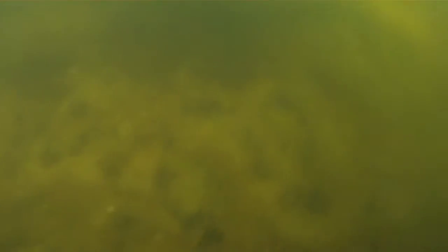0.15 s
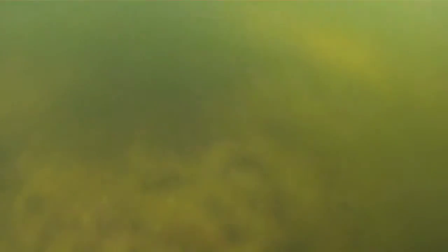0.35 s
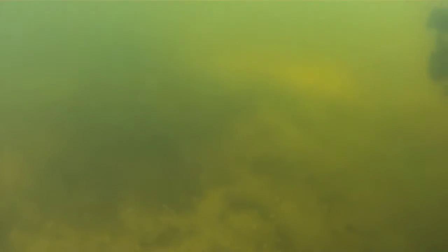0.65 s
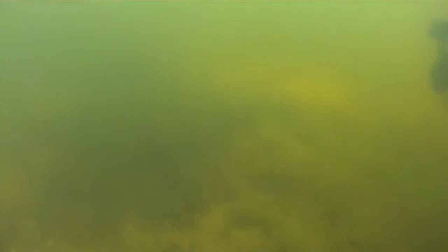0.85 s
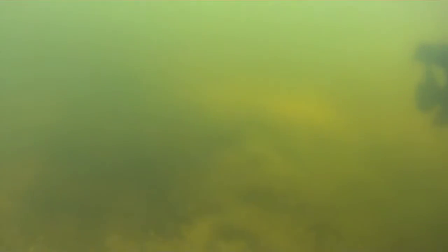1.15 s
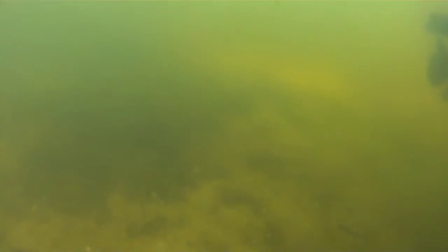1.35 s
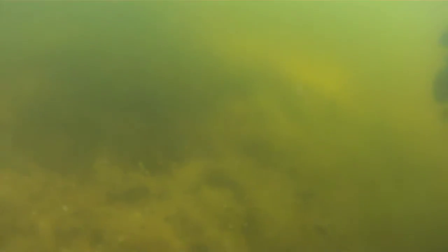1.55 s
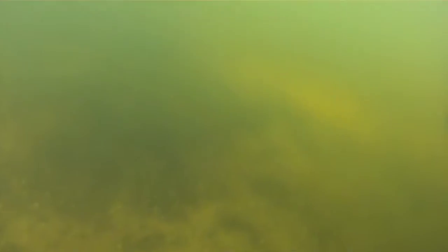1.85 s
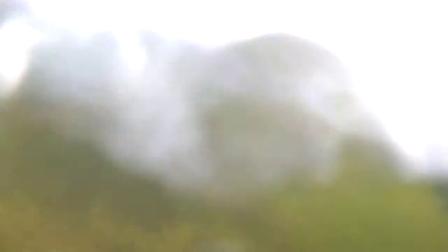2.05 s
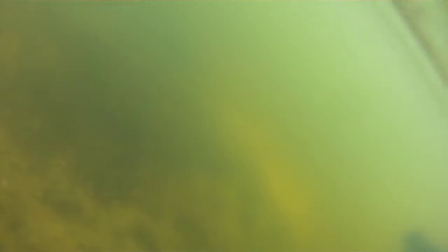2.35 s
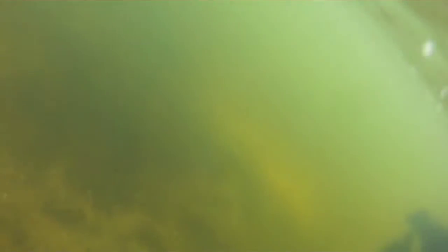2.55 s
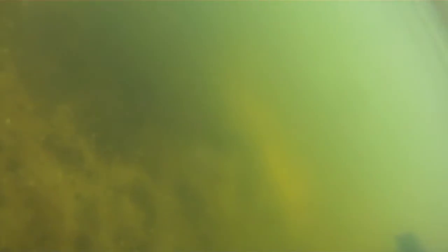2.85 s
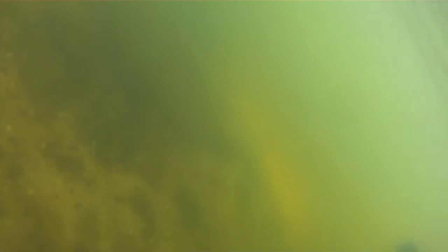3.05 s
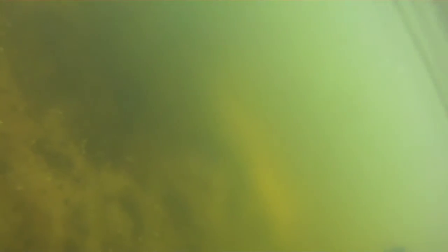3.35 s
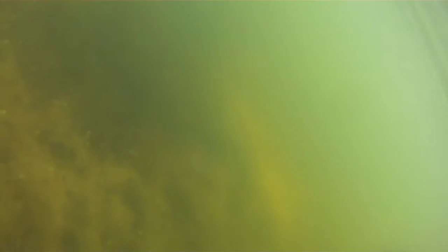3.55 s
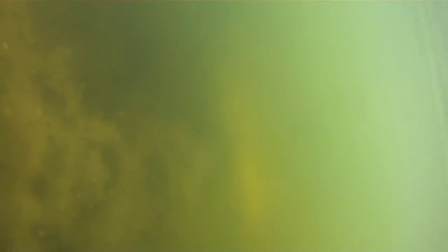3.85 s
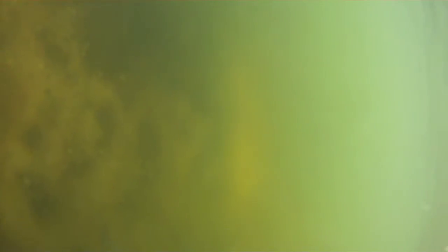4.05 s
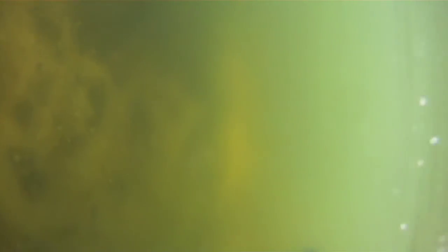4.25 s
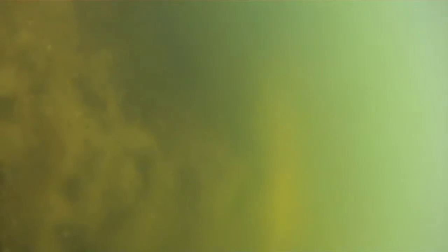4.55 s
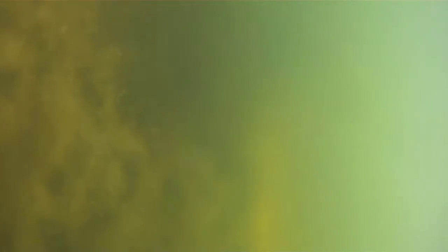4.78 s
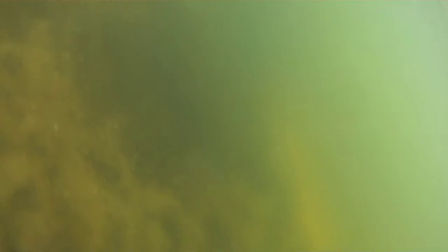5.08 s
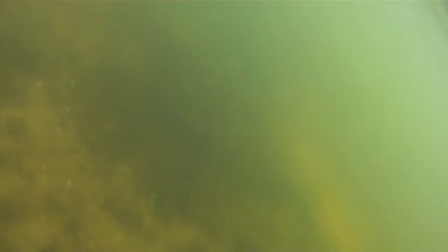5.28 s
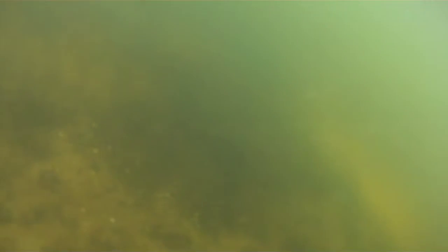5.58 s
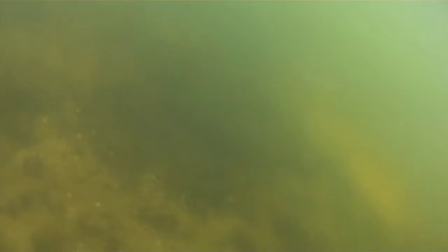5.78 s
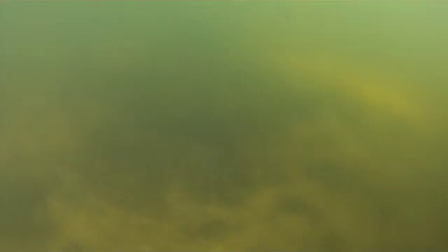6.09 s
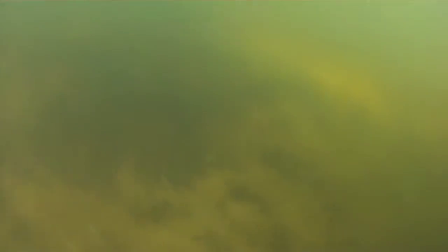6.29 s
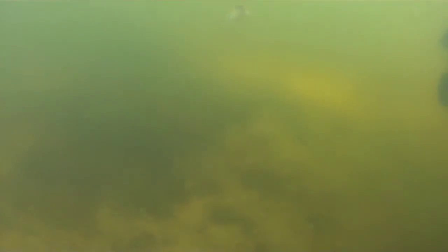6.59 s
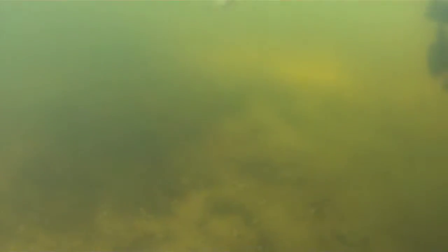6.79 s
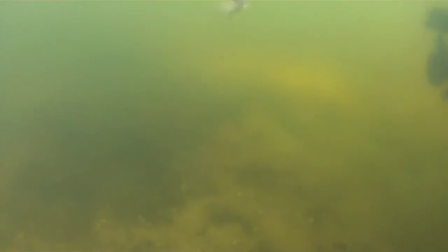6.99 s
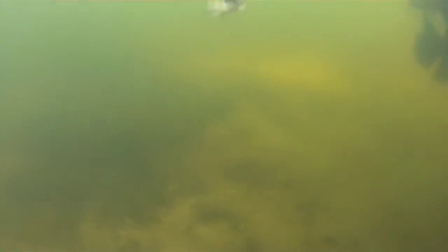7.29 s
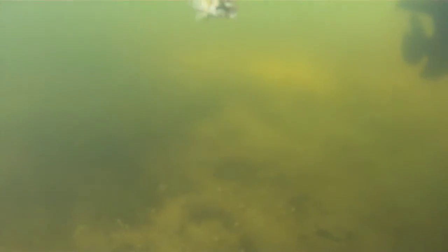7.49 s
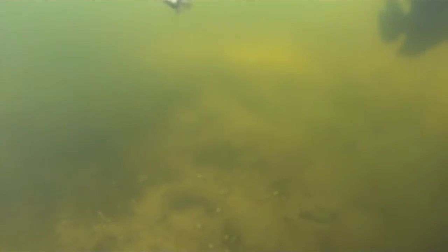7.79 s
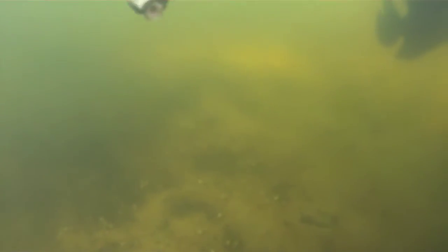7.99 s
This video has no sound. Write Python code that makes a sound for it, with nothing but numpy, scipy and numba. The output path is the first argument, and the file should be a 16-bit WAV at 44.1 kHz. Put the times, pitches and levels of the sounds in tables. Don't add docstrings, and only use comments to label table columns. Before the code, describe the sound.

A plastic camera housing underwater on a pole, heard from its own sealed microphone. It starts with rubbing, squeaky scrapes and low thumps, with a big hollow clack at 0.2 s and a hard knock at 0.34. A snap comes at 0.9, a thud and scrape at 1.1, then rapid bright knocks around 1.4 to 1.5 with a tiny rising bubble blip. A very sharp crack hits at 2.2. From 2.7 to 3 a run of small clicks rattles; 3 to 4.5 is sparser, with light ticks and low bumps. Knocks cluster at 4.6 to 4.9, then soft scrapes and thuds. The densest flurry, with heavy booms, scraping and clacks, runs 6.2 to 7.0. A last thump and rub near 7.2 fade into faint scuffs by 8. Low shuddering rumble, dull hiss and faint pulses ten times a second persist; loud hits are gritty and briefly duck the background.

```python
import sys
import numpy as np
from scipy import signal
from scipy.fft import rfft, irfft
from scipy.io import wavfile
from scipy.ndimage import uniform_filter1d
from numba import njit

SR = 44100
rng = np.random.default_rng(int(sys.argv[2]) if len(sys.argv) > 2 else 0)


def field_ratio(decibels):
    return 10 ** (np.asarray(decibels, dtype=float) / 20)


def master(y):
    cut = np.clip(np.atleast_2d(y).T, -1, 1)
    pcm = np.round(cut * 32767)
    wavfile.write(sys.argv[1], SR, pcm.astype(np.int16))


N = 358533

# t/s, peak level/dB, lowest mode f/Hz, upper modes' level/dB
JOLTS = [(0.01, -30, 95, -28), (0.084, -23, 88, -28), (0.296, -28.5, 89.3, -7.5), (0.466, -33.5, 95, -4),
         (1.127, -22.5, 85.2, 9), (1.306, -33.5, 84, 7.5), (1.524, -35.5, 106, -16),
         (1.676, -26.5, 71.3, -18), (1.819, -26, 71, -14.5), (2.128, -37, 93.4, -14.5),
         (2.583, -46.5, 82, -28), (2.936, -29, 62.5, -7.5), (3.507, -37, 78, -18), (3.696, -35, 84, -29),
         (3.845, -28.5, 84.4, -8), (4.065, -37, 75.9, -8.5), (4.688, -33.5, 89, -19),
         (4.882, -22, 88.7, -18), (5.168, -33.5, 71, -13), (5.429, -26, 84, -11.5), (5.704, -33.5, 72, -2),
         (5.935, -28.5, 73.8, -2.5), (6.174, -18, 78, -4.5), (6.661, -19.5, 80, -3), (6.924, -27, 80.5, -5),
         (7.169, -19.5, 64.5, -2.5), (7.312, -34, 84.8, -1)]
# f/Hz, width/Hz, level/dB
HOLLOW = [(572.4, 61.8, 7), (631.6, 82, 8), (733.5, 73, 6), (876, 100, 3), (891, 96, 3), (1206, 450, -2.5),
          (1370, 120, -5), (394, 110, -3.5)]
# f/Hz, width/Hz, level/dB
WALLS = [(1420, 200, -.5), (2130, 300, 1), (2700, 130, -1.5), (3068, 395, -4.5), (3800, 220, -12),
         (5060, 230, -23.5)]
# f/Hz, width/Hz, level/dB
POLE = [
    (84, 10, 1),
    (136, 29, -10),
    (213, 60, -23),
]


def level(x, db):
    return x * field_ratio(db) / np.sqrt(np.mean(x ** 2))


def body(x, modes):
    total = 0
    for k, (hz, width, db) in enumerate(modes):
        b, a = signal.iirpeak(hz, hz / width, SR)
        total = total + (-1) ** k * field_ratio(db) * signal.lfilter(b, a, x)
    return total


def ring(t, hz, t60, phase=0.):
    return np.sin(2 * np.pi * hz * t + phase) * np.exp(-np.log(1000) * t / t60)


def add(track, s, sound):
    i = int(s * SR)
    track[i:i + len(sound)] += sound[:N - i]


def walk(rate):
    hold = int(SR / rate)
    steps = np.repeat(rng.standard_normal(N // hold + 1), hold)
    return 1.2 * uniform_filter1d(steps, hold)[:N]


def curve(table):
    return np.interp(np.arange(N) / SR, *np.transpose(table))


def hiss():
    # f/Hz, level/dB per Hz
    spectrum = [(88, -45), (150, 1), (775, -20), (1250, -16.5), (1830, -25), (5500, -22.5), (7150, -60.5),
                (12100, -120)]
    hz, db = np.transpose(spectrum)
    bins = np.fft.rfftfreq(N, 1 / SR) + 1
    shape = field_ratio(np.interp(np.log(bins), np.log(hz), db))
    return level(irfft(rfft(rng.standard_normal(N)) * shape, N), -60.5)


def pulses():
    start_s, period_s, length_s = .001, .1001, .022
    gate = (np.arange(N) / SR - start_s + length_s / 2) % period_s < length_s
    dull = body(rng.standard_normal(N), [(356, 460, -3.0), (1300, 900, -7.0)])
    noise = level(body(dull, [(700, 1400, 0)]), -54.5)
    return noise * uniform_filter1d(1. * gate, size=200) * field_ratio(1.5 * walk(9))


def shaking():
    # t/s, level/dB
    current_points = [(0, -31), (.5, -49.5), (.98, -51.5), (1.4, -39), (2, -52.5), (2.6, -43), (3.2, -48.5),
                      (4.1, -43), (4.8, -43), (5.3, -51.5), (6.45, -39.5), (7, -56), (7.4, -43.5),
                      (8.13, -55.5)]
    lag_s, rise_db_s, fall_db_s = 0.045, 251, 166
    wake_db = np.full(N, -90.)
    for s, db, *_ in JOLTS:
        t = np.arange(N) / SR - s - lag_s
        wake_db = np.maximum(wake_db, db - np.maximum(-rise_db_s * t, fall_db_s * t))
    current, wake = field_ratio(curve(current_points)), field_ratio(wake_db)
    shudder = np.hypot(current, wake * field_ratio(-6.5))
    swing = np.hypot(current * field_ratio(1.5), wake * field_ratio(-5))
    return shudder, swing


def pushed_pole():
    # f/Hz, width/Hz, level/dB
    sway_modes = [
        (27.6, 5, -5),
        (50.3, 30, -8.5),
    ]
    shudder, swing = shaking()
    push = rng.standard_normal((2, N))
    pole = level(body(body(push[0], POLE), [(110, 260, 0)]), -3.0) * shudder
    sway = level(body(body(push[1], sway_modes), [(41, 86, 0)]), -2.2) * swing
    return pole + sway


def strokes():
    # t/s, pressure level/dB
    grip = [(0, -39.5), (.39, -49), (.77, -56), (1.16, -52), (1.55, -53.5), (1.94, -64), (2.32, -56.5),
            (2.71, -55.5), (3.1, -57.5), (3.48, -61), (4.06, -55.5), (4.65, -54.5), (5.03, -60.5),
            (5.81, -57.5), (6.19, -51.5), (6.58, -49.5), (7.36, -70), (8.13, -70)]
    # peak t/s, length/s, level/dB, brightness/dB
    drags = [(.017, .067, -30.5, -2.5), (.266, .043, -23.5, -0.5), (.825, 0.07, -52, 1),
             (1.021, 0.022, -43, -4), (1.126, 0.036, -23, -6.5), (1.319, 0.14, -44.5, -5.5),
             (1.535, 0.046, -46, -10), (2.059, 0.11, -55, 0), (2.646, 0.065, -44, -7),
             (2.716, 0.33, -55.5, -3), (3.521, 0.026, -49, -3.5), (3.849, .1, -38.5, -6),
             (4.865, 0.025, -46, 1), (4.935, 0.045, -43, -4), (5.435, 0.085, -40.5, -9),
             (5.959, 0.06, -33.5, -6), (6.194, 0.061, -26, -5), (6.382, 0.02, -33, 0),
             (6.667, 0.027, -22.5, -10), (6.72, 0.062, -42, -9), (6.82, 0.016, -47, 14.5),
             (6.92, .026, -62, -9), (7.182, .11, -36, -5.5), (7.427, .086, -52.5, -7.5),
             (6.645, .03, -32, -8), (1.15, .06, -36, -3), (5.99, .05, -42, 0), (6.078, .04, -48, -6),
             (7.255, .03, -42, -8), (7.53, .03, -54, -10)]
    # peak t/s, length/s, level/dB, brightness/dB
    slips = [(.125, 0.04, -32, -10), (.166, 0.083, -34.5, 6), (.302, 0.065, -24, -8), (.47, 0.072, -37, -3),
             (.647, 0.16, -55.5, 2), (.964, 0.018, -45, -7), (1.194, .054, -38, 5.7),
             (1.405, 0.092, -43, -6), (1.679, 0.03, -34, -11.5), (1.726, 0.025, -26, -19),
             (1.852, 0.036, -30.5, -10.5), (2.497, 0.092, -54, 2), (3.706, 0.04, -48, -5.5),
             (4.165, 0.09, -47, -8), (4.35, 0.17, -52, -10), (4.74, 0.07, -48, -5),
             (5.068, 0.035, -45.5, -9), (5.172, 0.038, -38, -10), (5.304, 0.054, -51.5, -10.5),
             (5.511, 0.07, -39, -7), (5.678, 0.0096, -31, -25), (5.733, 0.058, -42.5, -0.5),
             (6.966, .05, -51, 4.5), (7.02, 0.052, -45, -15), (7.814, 0.036, -51.5, -11)]
    power = field_ratio(2 * (curve(grip) + np.array([[0], [-5]])))
    for slides, rise_share in ((drags, .2), (slips, 0.66)):
        for s, length, db, bright_db in slides:
            i = slice(max(int((s - .3) * SR), 0), min(int((s + .4) * SR), N))
            t = (np.arange(i.start, i.stop) / SR - s) / length
            swell_db = -8 * (t / rise_share) ** 2
            fade_db = -8 * np.abs(t / (1 - rise_share)) ** 1.4
            shape_db = np.where(t < 0, swell_db, fade_db)
            power[:, i] += field_ratio(2 * (shape_db + db + np.array([[0], [bright_db]])))
    return np.sqrt(power)


def rustle(modes, patchy_db):
    mix = 0
    for hz, width, db in modes:
        mode = body(rng.standard_normal(N), [(hz, width, db)])
        steep = body(mode, [(hz, 3 * width, 0)])
        mix = mix + field_ratio(patchy_db * walk(16)) * steep
    return level(mix, 0)


def creaks(effort):
    happens = rng.random(N) < 60 / SR
    strength = field_ratio(5.0 * rng.exponential(size=N)) * np.sign(rng.standard_normal(N))
    damped_walls = [(hz, 3 * width, db / 2) for hz, width, db in WALLS]
    return field_ratio(7.5) * body(happens * strength * effort, damped_walls)


def jolts():
    out, t = np.zeros(N), np.arange(12000) / SR
    second = ring(t, (POLE[1][0] + 6) * (1 - .3 * t), .55)
    for s, db, hz, upper_db in JOLTS:
        upper = second + .25 * ring(t, POLE[2][0], .2)
        thump = 0.57 * ring(t, 48, 0.23) + 3.6 * ring(t, 1.1 * hz, 0.11)
        modes = ring(t, hz, 0.39) - field_ratio(upper_db) * upper + thump
        add(out, s, field_ratio(db - 3) * (1 - np.exp(-t / .005)) * modes)
    return out


def sings():
    # centre t/s, length/s, level/dB, f/Hz
    notes_sung = [(.025, .035, -39, 2800), (.04, .05, -35, 580), (.148, .08, -28, 2120),
                  (.15, .04, -35, 1550), (.48, .08, -45, 2020), (1.178, .02, -37, 2550),
                  (1.198, .012, -36, 2650), (2.45, .12, -58, 2700), (5.46, .08, -49, 2750),
                  (5.51, .04, -49, 2800), (5.47, .05, -42, 800), (5.99, .05, -44, 2600),
                  (6.02, .05, -47, 2000), (6.205, .06, -42, 2750), (6.19, .05, -31, 620),
                  (6.69, .04, -44, 2700), (1.725, .03, -42, 3150), (1.675, .02, -45, 3100),
                  (1.855, .04, -38, 950), (4.94, .05, -42, 620), (3.87, .06, -50, 3200)]
    half = 4000
    t = np.arange(-half, half) / SR
    for_each = rng.standard_normal((30, 2 * half))
    out = np.zeros(N)
    for (s, length, db, hz), grit in zip(notes_sung, for_each):
        mode = [(hz, .09 * hz, 0)]
        sound = level(body(body(grit, mode), mode), db) * np.exp(-(2 * t / length) ** 4)
        skip = max(half - int(s * SR), 0)
        add(out, max(s - half / SR, 0), sound[skip:])
    return out


def knocks():
    # t/s, peak level/dB, ring f/Hz, ring t60/s
    pings = [(0.1345, -22, 2090, 0.03), (0.3412, 1, 1900, 0.014), (1.403, 9, 2200, 0.0097),
             (1.4115, 1, 2300, 0.0047), (1.6719, -12, 507, 0.041), (2.0518, -13, 1750, .04),
             (2.337, -11, 2860, 0.02), (4.6063, 2, 2300, 0.022), (4.6495, -1, 2150, 0.02),
             (4.72, -14.5, 1930, 0.035), (5.872, -15, 2600, .01), (6.2855, 1, 1170, 0.024),
             (6.3545, -11, 1780, 0.013), (6.8629, -12, 1830, 0.0095), (6.9744, -13, 1650, 0.0057),
             (4.608, -14, 2130, .04), (2.195, 0, 1800, .005), (6.351, -11, 2100, .012),
             (5.619, -38, 2200, .012), (6.663, -6, 1800, .01), (1.142, -14, 700, .025),
             (6.355, -18, 700, .025), (0.642, -27, 850, .03), (4.6385, -13, 1500, .006),
             (6.668, -11, 560, .04), (0.2062, 2, 270, .009), (1.129, 3, 2150, .014), (6.6635, -4, 640, .03),
             (2.3375, -17, 2200, .015), (2.338, -18, 3400, .012)]
    # t/s, peak level/dB, ring f/Hz, ring t60/s
    ticks = [(0.295, -5, 3580, 0.018), (0.6412, -15, 3600, 0.022), (1.3114, -16, 2700, 0.0029),
             (1.4432, 12, 2340, 0.0053), (1.4616, -15.5, 600, 0.023), (1.9982, -35.5, 1880, 0.0063),
             (2.7872, -10.5, 2280, 0.0096), (2.8495, -23, 2250, .016), (3.712, -24, 2186, 0.0095),
             (4.3413, -16, 3430, 0.0093), (4.6396, -12.5, 3950, 0.019), (5.827, -34.5, 1390, 0.014),
             (6.2765, -21, 2320, .014), (6.3445, -14.5, 3760, 0.0064), (6.3877, -7, 2270, 0.01),
             (6.4572, -14, 4900, 0.011), (6.9657, -14, 2230, 0.0049), (1.1265, -3, 3000, .007),
             (6.664, -19, 2600, 0.015), (7.19, -19, 2490, 0.0087), (6.3755, -7, 3300, .012),
             (6.3055, -30, 2400, .01), (7.272, -40, 3600, .01), (2.2313, -36, 3500, .008),
             (6.39, -14, 2100, .012), (2.124, -43, 2500, .01), (5.5024, -32, 2100, .012),
             (6.222, -23, 2500, .012), (1.4495, -16, 3700, .012), (6.277, -25, 5200, .01)]
    # t/s, peak level/dB, ring f/Hz, ring t60/s
    snaps = [(0.9114, -7, 2600, 0.009), (1.4345, -2, 2300, 0.012), (2.027, -42, 3460, 0.0046),
             (2.074, -31, 4300, 0.011), (2.081, -35, 2300, 0.0052), (2.0935, -29, 1110, 0.08),
             (2.1958, 14, 3550, 0.011), (7.303, -25.5, 3950, 0.0059), (2.2952, -12, 2190, 0.0051),
             (2.3033, -27, 2850, 0.0094), (2.7078, -28.5, 1950, 0.023), (2.728, -26, 2390, 0.016),
             (2.8175, -21, 2220, 0.012), (2.8301, -5.5, 2350, 0.017), (2.9966, -29, 2230, 0.0089),
             (3.7749, -19.5, 3500, 0.0063), (4.4707, -23.5, 2240, .008), (4.58, -35.5, 3690, 0.0066),
             (4.7041, -19.5, 2150, 0.016), (4.7636, -33.5, 613, .054), (5.632, -24, 1480, 0.015),
             (6.383, -5.5, 4130, 0.015), (6.8192, -22, 700, 0.029), (2.8435, -14, 4776, 0.009),
             (3.769, -31, 4500, .005), (3.8262, -34, 4500, .006), (3.502, -43, 4500, .006),
             (6.9361, -29, 3500, .006), (6.835, -38, 3600, .006), (6.147, -43, 4500, .005)]
    # t/s, peak level/dB, ring f/Hz, ring t60/s
    thuds = [(0.1147, -23, 2120, 0.03), (0.304, -10.5, 1020, 0.036), (1.114, -9, 850, 0.03),
             (1.1285, 1, 1410, .018), (1.2765, -21.5, 2420, 0.0087), (1.5683, -20.5, 2250, 0.017),
             (1.6803, -19.5, 628, .046), (1.847, -18.5, 883, 0.063), (1.8598, -17, 915, 0.018),
             (2.4857, -25.5, 745, 0.05), (4.1643, -24, 1100, 0.033), (4.8578, -32, 610, .023),
             (4.863, -33, 1410, 0.018), (5.3874, -27, 950, 0.023), (5.9135, -33, 3520, 0.0083),
             (6.6405, -25, 807, 0.045), (6.6645, -11, 800, 0.035), (6.956, -14.5, 895, 0.017),
             (7.1922, -14, 855, 0.024), (1.1065, -23, 1310, 0.04), (1.1322, -8.5, 730, 0.015),
             (2.8845, -24, 756, 0.028), (2.8915, -14, 1150, 0.02), (0.2058, 9, 950, .016),
             (5.673, -22, 820, .025), (7.171, -26, 880, .03), (5.94, -28, 770, .03), (6.162, -30, 620, .03),
             (6.174, -24, 600, .04)]
    # t/s, peak level/dB, ring f/Hz, ring t60/s
    clacks = [(0.205, 17, 1440, 0.017), (0.4517, -42, 770, 0.011), (0.579, -35, 3500, 0.016),
              (1.377, -23.5, 685, 0.019), (1.538, -25.5, 2190, 0.021), (1.722, -26, 770, 0.076),
              (2.39, -29, 2300, 0.0071), (2.806, -25, 2500, 0.012), (2.8386, -16.5, 2180, 0.01),
              (2.86, -20, 2200, 0.02), (2.888, -17, 2000, 0.012), (2.9268, -12, 2400, 0.014),
              (3.5498, -18, 2800, 0.0086), (3.6621, -28, 2120, 0.019), (3.698, -27.5, 720, 0.022),
              (4.6322, -21, 2700, 0.012), (4.6914, -23, 2770, 0.011), (5.6721, -12, 4540, 0.013),
              (6.372, -5, 2200, 0.017), (6.7645, -31.5, 3730, 0.013), (6.9172, -31.5, 776, 0.049),
              (7.0612, -38, 2780, 0.016), (7.3454, -30, 1780, 0.012), (6.376, -12, 1600, .015),
              (1.469, -24, 3600, .008), (1.239, -34, 2600, .01), (1.391, -32, 5000, .008),
              (0.281, -20, 1500, .012), (0.312, -18, 900, .02)]
    # t/s, peak level/dB, ring f/Hz, ring t60/s
    taps = [(0.71, -36, 2000, .012), (0.913, -24, 3750, .02), (1.667, -20, 520, .025),
            (2.197, -8, 3650, .03), (2.357, -38, 2700, .01), (2.783, -30, 1200, .01),
            (2.8245, -24, 1000, .012), (2.8285, -16, 2500, .008), (2.861, -25, 3800, .018),
            (2.922, -34, 3000, .006), (2.929, -20, 2050, .02), (4.641, -24, 610, .06),
            (4.651, -22, 600, .07), (4.732, -30, 2900, .015), (4.828, -40, 3000, .006),
            (4.968, -38, 3600, .01), (3.775, -30, 1500, .008), (6.849, -40, 4800, .005),
            (2.081, -33, 1500, .008), (2.0945, -32, 2800, .01)]
    # events, hollow shell level/dB, crack level/dB, rebound level/dB, attack/s
    contacts = [
        (pings, -22.5, -58, -31, .001),
        (ticks, -15, -12, -13, 0.00067),
        (snaps, -20.5, 0, -16, 0.0011),
        (thuds, -6.5, -35.5, -20.5, 0.00075),
        (clacks, -5.5, -4, -15.5, 0.00042),
        (taps, -20, -24, -18, .0007),
    ]
    damped_hollow = [(hz, 3 * width, db) for hz, width, db in HOLLOW[:6]]
    damped_walls = [(hz, 3 * width, db / 2) for hz, width, db in WALLS[3:]]
    out, t = np.zeros(N), np.arange(3000) / SR
    for events, shell_db, crack_db, rebound_db, attack_s in contacts:
        attack = 1 - np.exp(-(t / attack_s) ** 2)
        chance = rng.random((30, 3))
        grit = rng.standard_normal((30, len(t)))
        for (s, db, hz, t60), c, g in zip(events, chance, grit):
            partner = ring(t, hz * (1.1 + 0.13 * c[0]), t60, 2 * np.pi * c[1])
            pair = ring(t, hz, t60) + 0.17 * partner
            rough = g * np.exp(-np.log(1000) * t / min(0.54 * t60, .02))
            shell = body(body(rough, damped_hollow), [(750, 880, 0)])
            crack = body(rough, damped_walls)
            near = [(hz, 0.81 * hz, 0)]
            chatter = body(body(body(rough, near), near), near)
            parts = [(pair, -2), (shell, shell_db), (crack, crack_db), (chatter, -6)]
            knock = attack * sum(field_ratio(db + rel_db) * p / np.abs(p).max() for p, rel_db in parts)
            add(out, s - .0007, knock)
            add(out, s + .0015 + .003 * c[2], knock * field_ratio(rebound_db))
    return out


def bubble():
    # t/s, starting f/Hz, relative rise per s, level/dB, t60/s
    release = (1.472, 1400, 20.0, -36, .05)
    s, hz, rise, db, t60 = release
    out, t = np.zeros(N), np.arange(2000) / SR
    add(out, s, field_ratio(db) * ring(t, hz * (1 + rise * t / 2), t60))
    return out


def scene():
    hollow, walls = strokes() * field_ratio(3.0 * walk(90))
    rub = rustle(HOLLOW, patchy_db=4.5) * hollow + rustle(WALLS, patchy_db=3.5) * walls
    steady = hiss() + pulses() + pushed_pole()
    contact = rub + creaks(walls) + jolts() + sings() + knocks()
    mono = steady + contact + bubble()
    amplifier = level(body(rng.standard_normal(N), [(4600, 3500, 0)]), -82)
    return mono + amplifier * np.array([[1], [-1]])


@njit
def limiter(x, top, attack, release):
    y, envelope = np.empty(len(x)), 0.
    for i in range(len(x)):
        size = abs(x[i])
        envelope += (size - envelope) * (attack if size > envelope else release)
        y[i] = x[i] * top / max(top, envelope)
    return y


def top_cut(x):
    return signal.sosfilt(signal.butter(12, 16220, fs=SR, output="sos"), x)


def record(dry):
    soft = signal.sosfilt(signal.butter(3, 5200, fs=SR, output="sos"), dry)
    slow = signal.resample_poly(soft, up=40, down=147, axis=1)
    slow = np.clip([limiter(side, .3, .02, 0.001) for side in slow], -.97, .97)
    over = np.maximum(np.abs(slow[0]) - .5, 0)
    settle = signal.lfilter([.012], [1, -.994], over) * walk(SR / 30)[:len(over)]
    uneven = signal.lfilter([.02], [1, -np.exp(-1 / (.05 * 12000))], over)
    mismatch = field_ratio(-17) * settle + field_ratio(-17) * np.minimum(uneven, .5) * slow[0]
    slow = slow + mismatch * np.array([[1], [-1]])
    stairs = np.repeat(slow, repeats=4, axis=1)
    held = signal.resample_poly(stairs, up=147, down=160, axis=1)[:, :N]
    held = signal.sosfiltfilt(signal.butter(14, 15420, fs=SR, output="sos"), held)
    return top_cut(held)


dry = scene()
out = record(dry)
master(out)
```